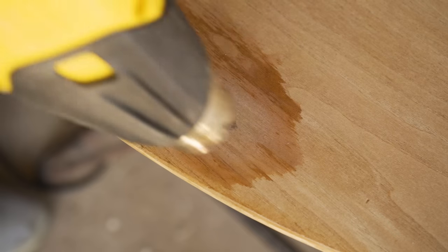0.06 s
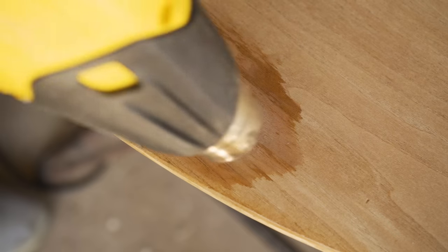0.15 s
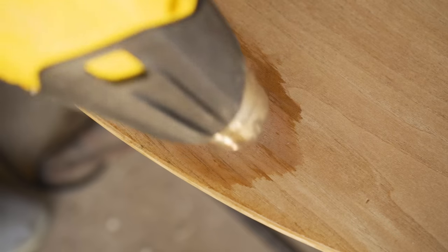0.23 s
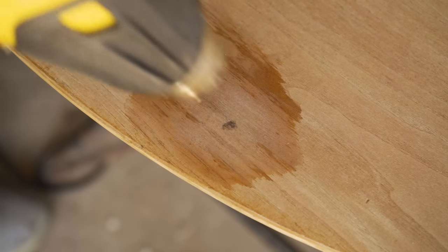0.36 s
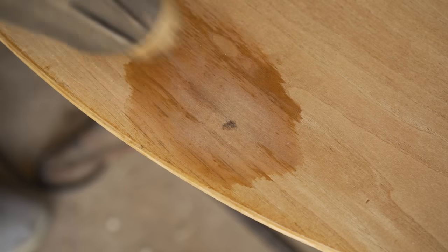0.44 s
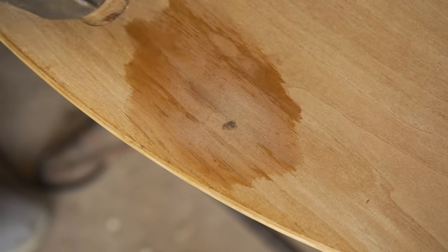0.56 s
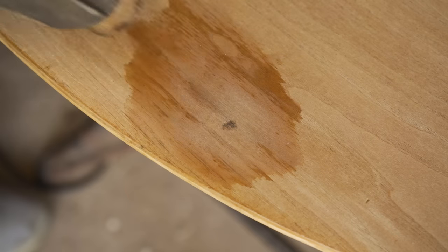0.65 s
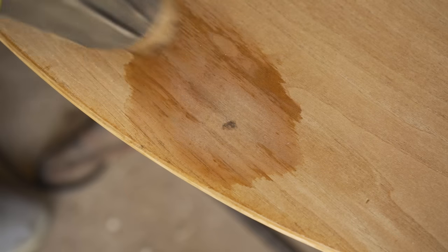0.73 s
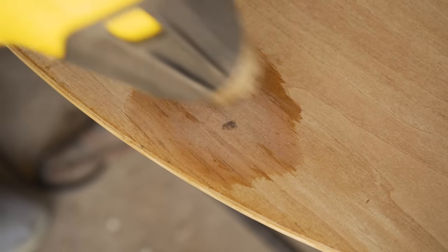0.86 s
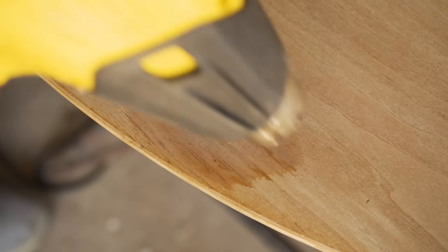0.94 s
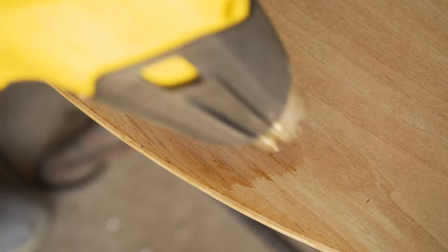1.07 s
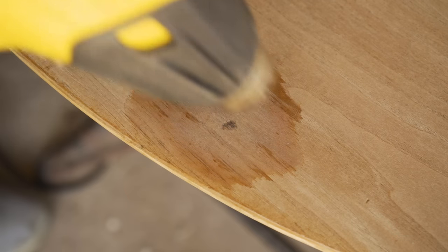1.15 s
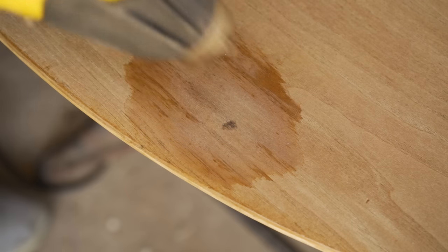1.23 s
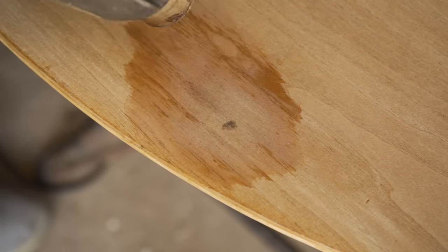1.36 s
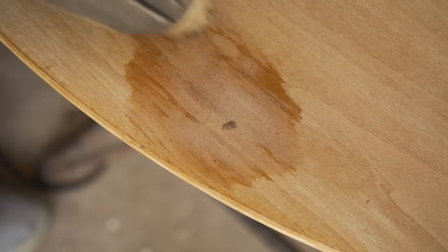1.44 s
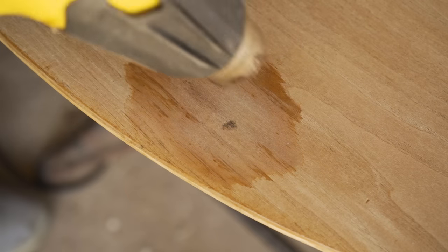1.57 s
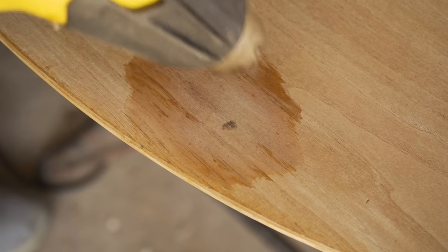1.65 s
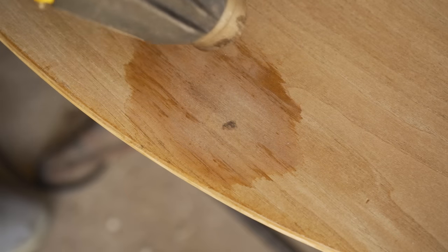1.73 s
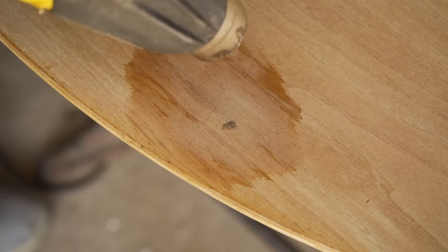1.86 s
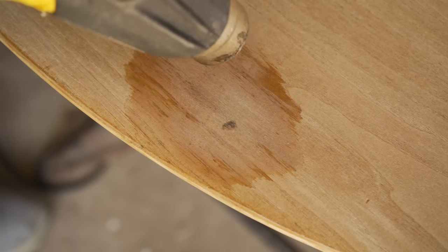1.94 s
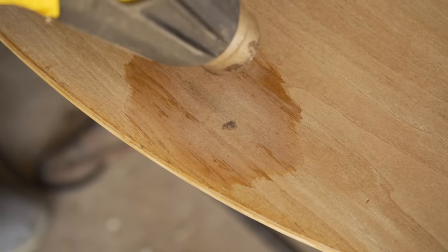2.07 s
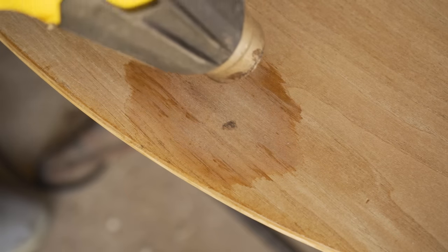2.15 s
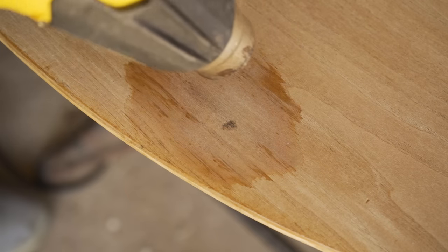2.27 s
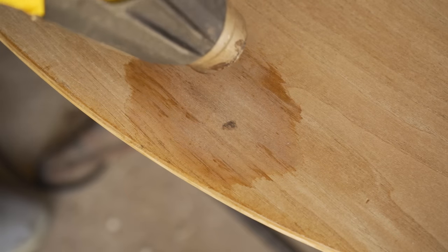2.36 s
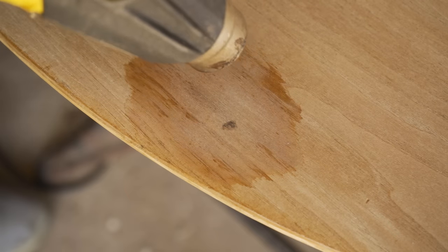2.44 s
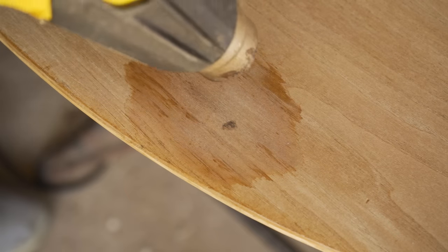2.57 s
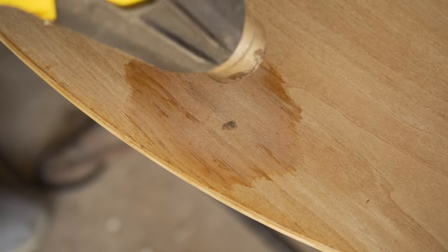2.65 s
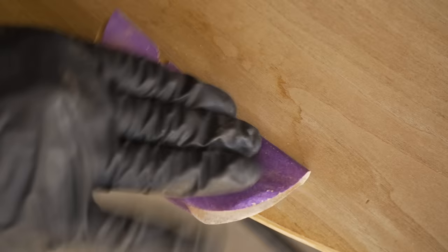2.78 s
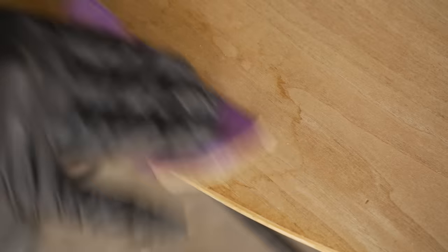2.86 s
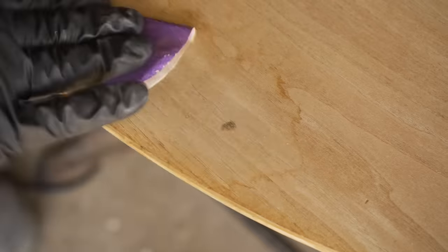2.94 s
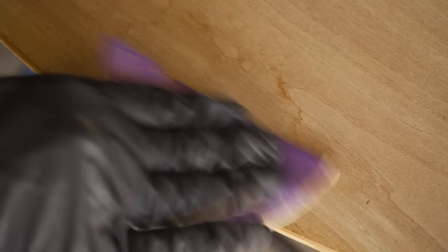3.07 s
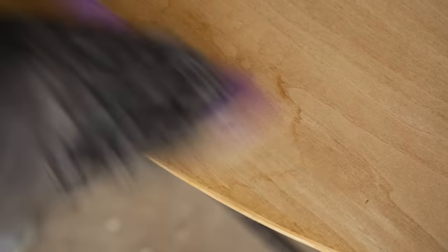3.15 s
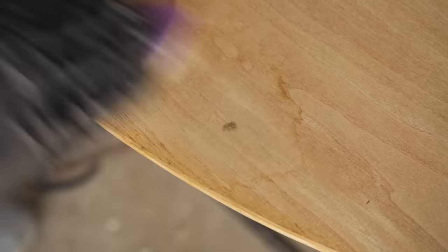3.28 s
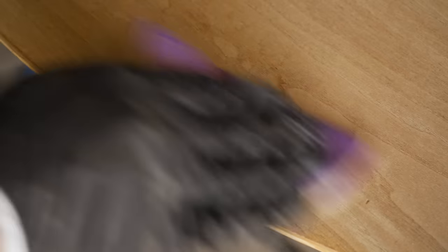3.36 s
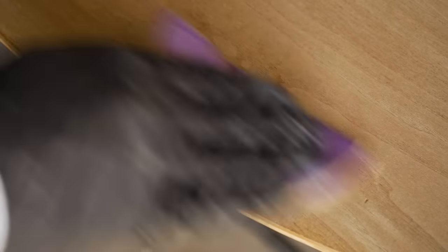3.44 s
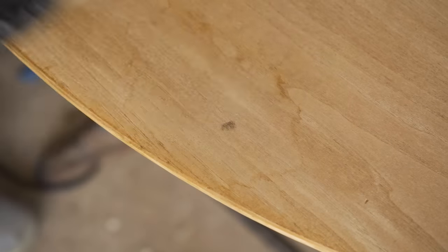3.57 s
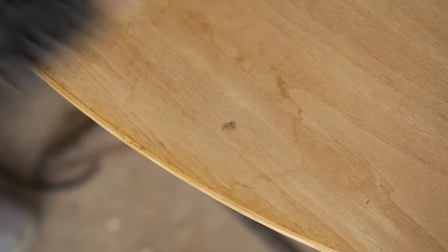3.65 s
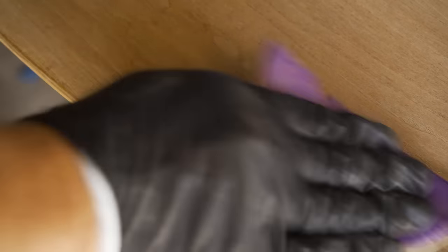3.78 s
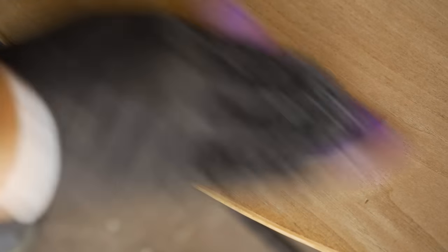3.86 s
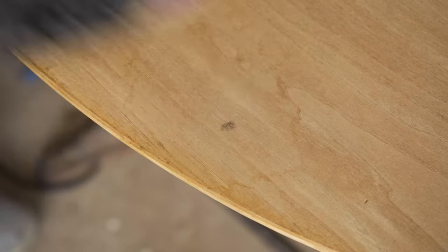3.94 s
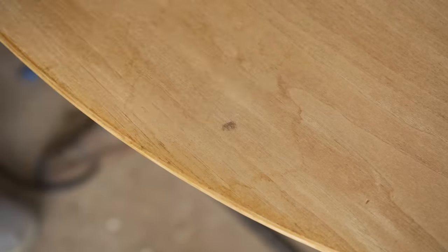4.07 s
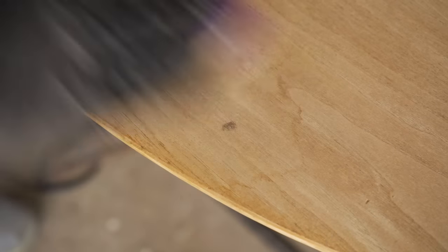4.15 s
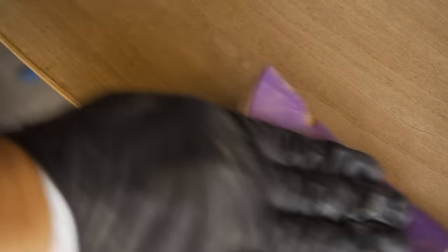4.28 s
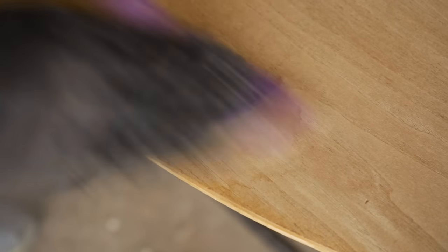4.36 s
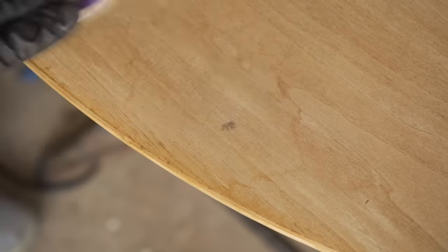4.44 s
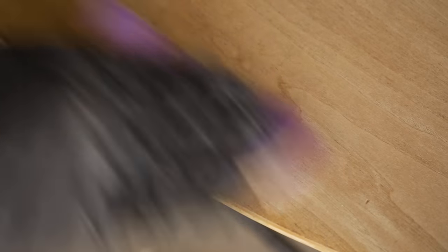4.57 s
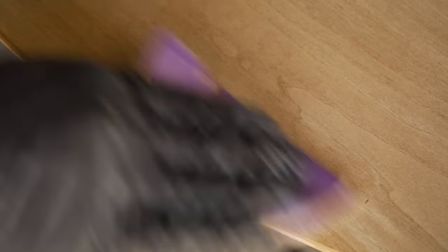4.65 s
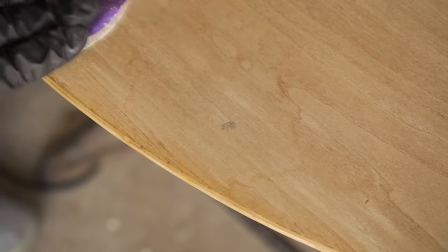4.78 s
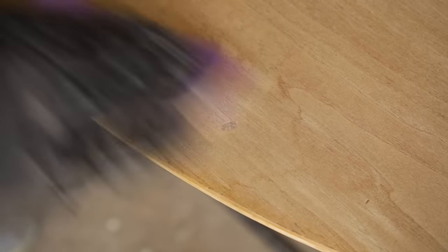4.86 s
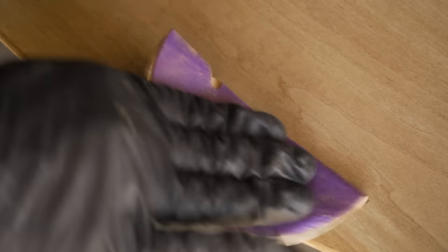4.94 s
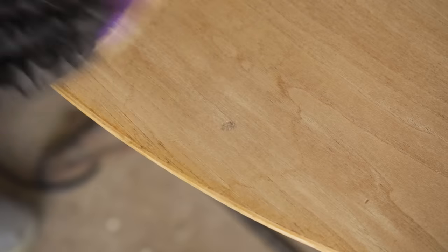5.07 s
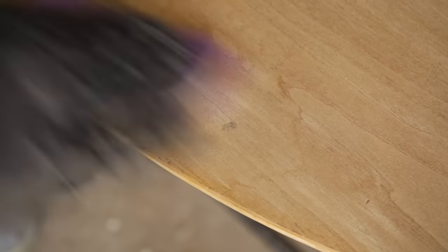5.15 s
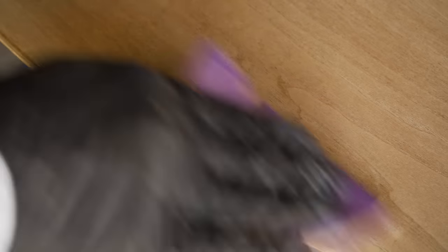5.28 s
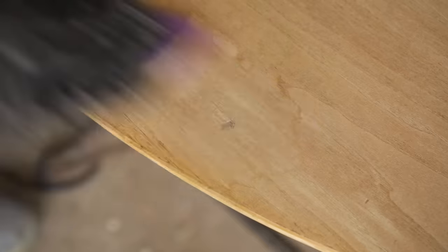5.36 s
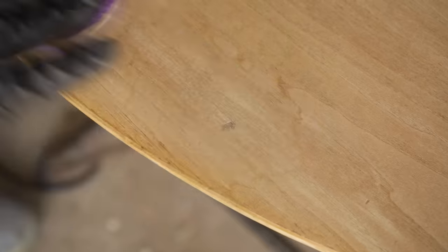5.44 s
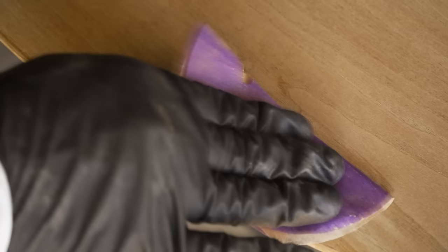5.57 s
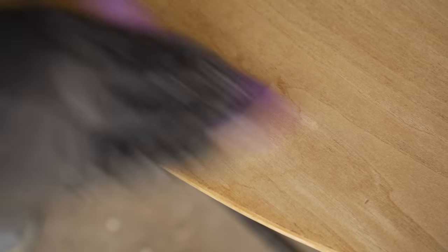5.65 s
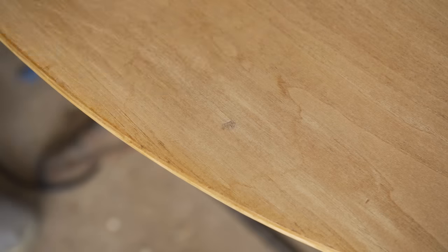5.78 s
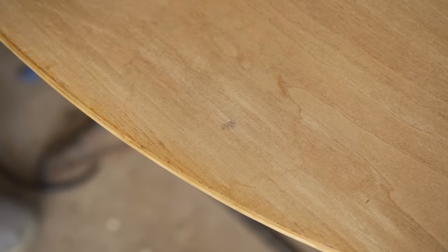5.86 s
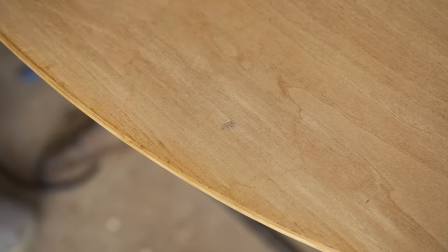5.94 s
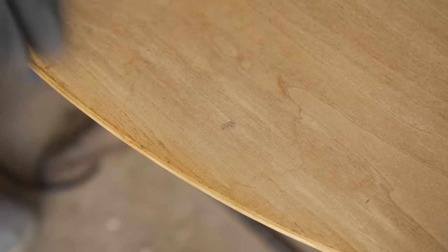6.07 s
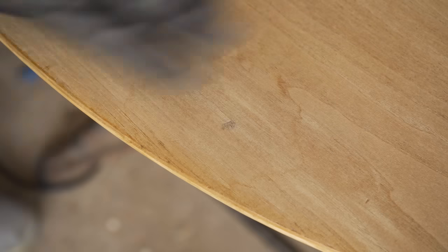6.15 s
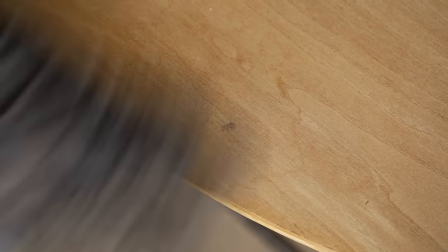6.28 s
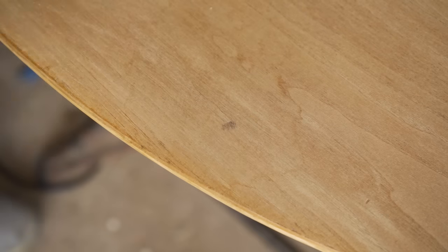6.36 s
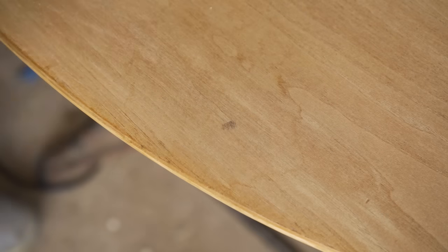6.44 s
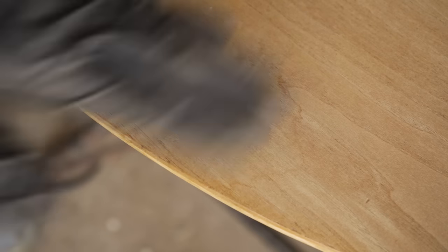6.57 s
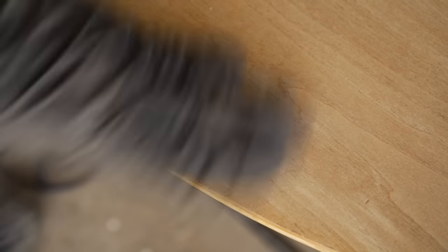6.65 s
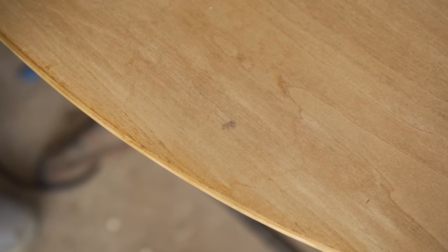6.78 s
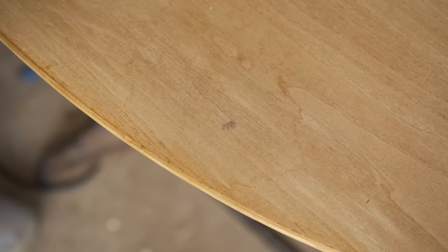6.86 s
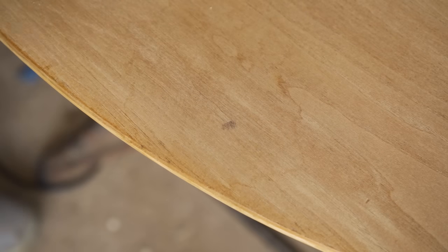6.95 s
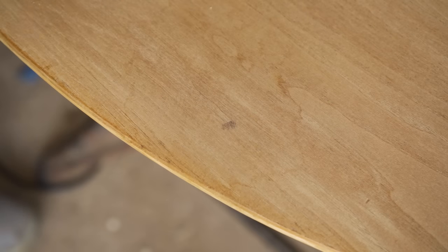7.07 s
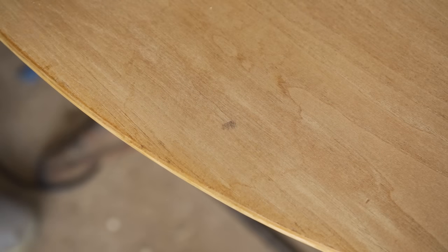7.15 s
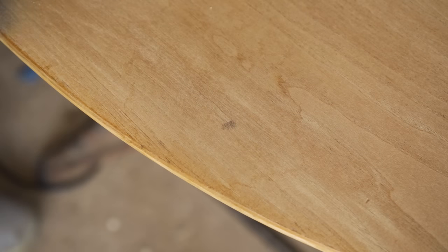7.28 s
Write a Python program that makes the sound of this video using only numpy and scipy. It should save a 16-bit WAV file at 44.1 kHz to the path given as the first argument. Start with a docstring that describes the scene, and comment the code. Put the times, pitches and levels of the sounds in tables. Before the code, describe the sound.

Steady hot-air blower noise stops dead, sandpaper rasps to and fro on a thin wooden panel, then two brushing sweeps and clattering wooden knocks.

```python
"""The roar of a hot-air blower with whining shaft tones is heard first; then the scene changes, and a hand
sands a thin panel to and fro. Then, over a faint hush, a glove sweeps dust off twice and the panel knocks on
its stand in a small workshop. Air and friction are shaped noise, the whine is sines at multiples of the shaft
speed, and the knocks are damped panel modes with noisy slaps; a short reverberation follows the contacts, on
one microphone."""
import sys
import numpy as np
from scipy import signal
from scipy.fft import rfft, irfft, next_fast_len
from scipy.io import wavfile
from scipy.ndimage import uniform_filter1d, map_coordinates

SR = 44100
rng = np.random.default_rng(int(sys.argv[2]) if len(sys.argv) > 2 else 0)


def convert_level_to_amplitude(level_db):
    """Map a level in decibels to its linear amplitude factor."""
    exponent = np.asarray(level_db, float) / 20
    return 10 ** exponent


def to_wav(sig):
    """Store sig (one row per channel, or 1-D mono) as 16-bit WAV at the path in sys.argv[1].

    Samples outside -1..1 are clipped; the rate is SR.
    """
    pcm = np.clip(np.atleast_2d(sig), -1, 1) * 32767
    pcm = np.round(pcm).astype(np.int16)
    wavfile.write(sys.argv[1], SR, pcm.T)  # frames by channels


N = 322529
BLOWER_END = 2.833  # s

# modes of the wooden panel: (frequency [Hz], relative level [dB], t60 [s])
PANEL_MODES = [(93.2, 2, .4), (156.3, 2.5, .3), (210, -12.5, 0.095), (248.4, 0.5, 0.34), (290, -6.5, 0.22),
               (342.5, -2.5, 0.2), (390, -27, 0.25), (565, -12, 0.23), (612.3, -6.5, 0.31), (726, -16, .15),
               (893, -25, 0.14), (1050, -31, 0.13), (1280, -13, 0.1), (1550, -10, 0.17), (1800, -13, 0.087),
               (2070, -16, .1), (2340, -16, .08), (4500, -12, .12)]
# sanding strokes, pull and push in turn:
# (start [s], end [s], level [dB], lean from start to end [dB], speeding-up time constant [ms])
SANDING_STROKES = [(2.862, 3.017, -41, -6, 46), (3.031, 3.16, -38.5, -1, 28.6), (3.168, 3.3, -39, -2.5, 16),
                   (3.309, 3.472, -38.5, 9, 16.4), (3.476, 3.67, -37, -2.5, 23),
                   (3.672, 3.873, -35.5, 2.5, 25), (3.873, 4.108, -35, -3, 24.4),
                   (4.118, 4.34, -35.5, 3.5, 24), (4.334, 4.53, -35.5, -6, 31),
                   (4.542, 4.694, -38.5, 6.5, 11.7), (4.693, 4.855, -38.5, -3.5, 22),
                   (4.868, 5.011, -38.5, 5, 15), (5.009, 5.161, -39, -3.5, 24.5),
                   (5.17, 5.32, -38, 7, 11.6), (5.324, 5.491, -38, -4.5, 16.5), (5.508, 5.654, -38, 4, 8.2),
                   (5.658, 5.87, -39.5, -4.5, 20)]


def unit(x):
    """Normalisation: the signal is scaled to rms 1."""
    return x / np.sqrt(np.mean(x ** 2) + 1e-20)


def along(points, hz):
    """Interpolation of (frequency [Hz], value) points on a logarithmic frequency axis."""
    f, v = np.transpose(points)
    return np.interp(np.log(hz + 1), np.log(f + 1), v)


def curves(rows):
    """Linear interpolation in time: one value per sample for each column after the time."""
    s, *cols = np.transpose(rows)
    return [np.interp(np.arange(N) / SR, s, c) for c in cols]


def wobble(rate):
    """Band-limited fluctuation: a smooth random curve with rate knots a second."""
    knots = rng.standard_normal(int(N * rate / SR) + 4)
    return map_coordinates(knots, [np.arange(N) * rate / SR])


def filtered(x, response):
    """Linear filtering: the spectrum is multiplied by a response of frequency."""
    m = next_fast_len(N + 8192)
    return irfft(rfft(x, m) * response(np.fft.rfftfreq(m, 1 / SR)), m)[..., :N]


def rush(spectrum, patchy_db, grit_db=0):
    """Coloured noise of rms 1: random gain patches in time and frequency; grit makes single grains stand out."""
    z = signal.stft(rng.standard_normal(N), nperseg=512)[2]
    field = uniform_filter1d(rng.standard_normal(z.shape), size=8, axis=0)
    field = uniform_filter1d(field, size=8, axis=1)
    noise = signal.istft(z * convert_level_to_amplitude(patchy_db * unit(field)), nperseg=512)[1][:N]
    grains = convert_level_to_amplitude(grit_db * unit(uniform_filter1d(rng.standard_normal(N), size=24)))
    return unit(filtered(noise * grains, lambda hz: convert_level_to_amplitude(along(spectrum, hz))))


def speed(start, end, up_ms, down_ms):
    """Kinematics of a stroke: hand speed 0-1 gathers after one turning point and drops before the next."""
    t = np.arange(N) / SR
    gathering = np.tanh(np.clip(t - start, 0, None) * 1e3 / up_ms)
    slowing = np.tanh(np.clip(end - t, 0, None) * 1e3 / down_ms)
    return gathering * slowing


def pressure(start, end, db, lean_db, ends_db=0):
    """Normal force as gain: it leans toward one end of the stroke; a positive ends_db adds force at both ends."""
    u = np.clip((np.arange(N) / SR - start) / (end - start), 0, 1) * 2 - 1  # -1 at the start, 1 at the end
    return convert_level_to_amplitude(db + lean_db * u / 2 + ends_db * u ** 2)


def shop(x):
    """Room reverberation: noise tails decay at a rate set by frequency, a new one for each stretch of sound."""
    # reverberation of the workshop: (frequency [Hz], t60 [s])
    reverberation = [(200, 0.44), (1500, 0.25), (4000, 0.37), (12000, 0.22)]
    out, step = np.zeros(N + 2 * SR), SR // 4
    for i in range(round(BLOWER_END * SR), N, step):
        hz, t, z = signal.stft(rng.standard_normal(SR // 2), SR, nperseg=256)
        decay = convert_level_to_amplitude(-60 * t / along(reverberation, hz)[:, None])
        tail = signal.istft(z * decay, SR, nperseg=256)[1]
        wet = signal.fftconvolve(x[i:i + step], tail / np.linalg.norm(tail))
        out[i + 200:][:len(wet)] += wet  # delay of 200 samples
    return out[:N]


def rustle():
    """Broadband noise with exponential envelopes: cloth swishes over the room's steady hush."""
    # cloth swishes: (loudest at [s], level [dB], swelling time constant [s], fading time constant [s])
    swishes = [(6.1, -65.5, .003, .02), (6.21, -65.5, 0.085, 0.13), (6.63, -64, 0.012, 0.016),
               (6.69, -66, .02, 0.071), (6.96, -77, .012, 0.066), (7.136, -57, 0.0028, 0.0099),
               (7.215, -61.5, 0.022, 0.032), (7.25, -65.5, .02, .008)]
    # spectrum of the rubbing cloth: (frequency [Hz], relative density [dB per Hz])
    cloth_spectrum = [(600, -5), (1200, -12), (2500, -3), (4500, 0), (7000, -6.5), (11000, -14.5),
                      (15800, -21)]
    # spectrum of the room's hush: (frequency [Hz], relative density [dB per Hz])
    hush_spectrum = [(500, -30), (900, -2), (1500, -4.5), (4000, -3), (8000, -9), (14900, -14),
                     (15700, -18)]
    hush_db, start_s = -74, 6.0
    t = np.arange(N) / SR
    swish = np.zeros(N)
    for s, db, rise, fade in swishes:
        swish += convert_level_to_amplitude(db) * np.exp(np.where(t < s, (t - s) / rise, (s - t) / fade))
    cloth = swish * convert_level_to_amplitude(1.3 * wobble(30)) * rush(cloth_spectrum, patchy_db=2.0, grit_db=3.0)
    hush = convert_level_to_amplitude(hush_db) * rush(hush_spectrum, patchy_db=-0.5, grit_db=1.5)
    return (cloth + hush) * (t > start_s)


def resonance(f, hz, db, t60):
    """Response of a damped resonator: its bandwidth is inverse to its decay time."""
    return convert_level_to_amplitude(db) * (3 / t60) / (hz - f + 3j / t60)


def tremble():
    """Forced vibration: unsteady hand force keeps the panel humming; its rocking on the stand goes its own way."""
    # level of the held panel's hum: (time [s], rocking [dB], low modes [dB], middle modes [dB])
    hum_levels = [(2.84, -77, -81, -70), (2.94, -86, -66, -58.5), (3.1, -80, -72, -56),
                  (3.3, -78, -74.5, -65), (3.8, -76, -68.5, -71), (4.5, -77, -71.5, -67),
                  (5.2, -76.5, -75, -68), (5.75, -73, -69.5, -67.5), (5.96, -73, -72, -77.5),
                  (6.2, -74, -72.5, -75), (6.47, -68, -64, -72), (6.7, -66, -69.5, -76),
                  (6.89, -60.5, -60, -68.5), (7.07, -77, -67, -78), (7.31, -66, -71, -72)]
    # dense middle modes of the panel, blurred together: (frequency [Hz], relative density [dB per Hz])
    middle_spectrum = [(300, -44), (450, -4.5), (610, -1.5), (900, -3), (1400, -0.5), (2500, -9),
                       (5000, -21)]

    def rocking_response(f):
        return resonance(f, *PANEL_MODES[0]) ** 2 + .04 * (f < 85)

    def low_response(f):
        modes = sum(resonance(f, *row) for row in PANEL_MODES[1:9])
        return modes / (1 + (120 / (f + 1)) ** 4)

    force = rng.standard_normal((2, N)) * convert_level_to_amplitude(4.1 * np.array([wobble(7.0), wobble(22)]))
    rocking = unit(filtered(force[0], rocking_response))
    low = unit(filtered(force[1], low_response))
    middle = rush(middle_spectrum, patchy_db=2.5, grit_db=2.4)
    rocking_db, low_db, middle_db = curves(hum_levels)
    hum = convert_level_to_amplitude(rocking_db) * rocking + convert_level_to_amplitude(low_db) * low + convert_level_to_amplitude(middle_db) * middle
    return hum * (np.arange(N) > BLOWER_END * SR)


def ticks():
    """Impulsive contact of grit and glove: a few damped cycles, a sharp edge and a puff of noise."""
    # small ticks: (time [s], nominal level [dB], frequency [Hz])
    tick_list = [(2.8414, -30.5, 4050), (2.848, -42, 4000), (3.022, -46, 1200), (5.9908, -66, 3540),
                 (6.0967, -54, 3570), (6.12, -55, 4590), (6.1554, -48.5, 1800), (6.288, -52, 3000),
                 (6.394, -31, 4500), (6.6388, -50.5, 1880), (6.9486, -57, 2070), (6.9723, -49, 2120),
                 (6.997, -55, 2150), (7.0473, -49.5, 2060), (7.1345, -50, 4380), (7.212, -56, 3320),
                 (7.2545, -50, 2480)]
    out, t = np.zeros(N + SR), np.arange(SR // 40) / SR
    for s, db, hz in tick_list:
        noise = rng.standard_normal(len(t))
        cycles = np.sin(2 * np.pi * hz * t) * convert_level_to_amplitude(-60 * t / 0.0039)
        edge = .2 * convert_level_to_amplitude(-60 * t / 0.00099)
        puff = 0.1 * convert_level_to_amplitude(-60 * t / 0.024)
        out[round(s * SR):][:len(t)] += convert_level_to_amplitude(db + 3.5) * (cycles + noise * (edge + puff))
    return out[:N]


def chatter(count=3):
    """Repeated impact: the panel chatters on its stand at uneven gaps, each blow in a set weaker than the last."""
    # chatter after a hard contact: (start [s], first ring level [dB], best-rung pitch [Hz], nominal gap [s])
    rattles = [(6.41, -50, 230, .02), (6.716, -49, 250, 0.017), (6.796, -54, 500, .024)]
    loss_db, slap_db, slap_t60 = 1, -9, .045  # loss per blow, slap relative to ring, slap decay in s
    late = rng.uniform(-0.22, 0.196, (len(rattles), count))
    blows = []
    for j, (s, db, hz, gap) in enumerate(rattles):
        for k in range(count):
            ring_db = db - loss_db * k
            blows.append((s + gap * (k + late[j, k]), ring_db, hz, ring_db + slap_db, slap_t60))
    return blows


def nudges():
    """Impulse from reversal: each change of the hand's direction nudges the panel just after a stroke sets off."""
    ring_db, scatter_db, best_hz = -67, 2.5, 230
    slap_db, slap_t60 = -72, .04  # dB, s
    median_delay = .024  # s
    blows = []
    for row, c in zip(SANDING_STROKES, rng.standard_normal((len(SANDING_STROKES), 2))):
        s = row[0] + median_delay * convert_level_to_amplitude(2 * c[0])
        change_db = scatter_db * c[1]
        blows.append((s, ring_db + change_db, best_hz, slap_db + change_db, slap_t60))
    return blows


def knocks():
    """Modal excitation: each blow slaps the surface and rings modes most near a pitch set by the contact."""
    # blows on the panel: (time [s], nominal ring level [dB], best-rung pitch [Hz], slap level [dB], slap t60 [s])
    knock_list = [(2.833, -53.5, 250, -41, 0.059), (3.186, -56, 210, -56, .05),
                  (3.508, -43.5, 620, -49, .04), (4.361, -60, 200, -66, .05),
                  (4.707, -58.5, 222, -56, 0.085), (5.853, -50.5, 400, -42, 0.093),
                  (6.303, -40.5, 201, -37.5, 0.06), (6.324, -42, 220, -60, .05),
                  (6.365, -59, 700, -42, .02), (6.382, -32.5, 330, -39.5, 0.049),
                  (6.391, -35, 170, -38, 0.14), (6.397, -39, 130, -47, .028),
                  (6.444, -44.5, 248, -58, 0.058), (6.462, -47, 200, -63, 0.087),
                  (6.703, -49, 300, -43.5, 0.073), (6.763, -60, 700, -42, .022),
                  (6.774, -39.5, 230, -49, .049), (6.787, -46, 400, -43, 0.065),
                  (6.81, -40.5, 402, -53, 0.058), (6.829, -50, 450, -49, .075)]
    # spectrum of a slap: (frequency [Hz], relative density [dB per Hz])
    slap_spectrum = [(200, -23), (500, 3), (900, -2), (1800, -1), (2500, -3.5), (3200, -9.5), (4500, -7.5),
                     (6500, -13.5), (15000, -42)]
    out, t = np.zeros(N + SR), np.arange(SR // 2) / SR
    hz, mode_db, t60 = np.transpose(PANEL_MODES)[:, :, None]
    blows = knock_list + chatter() + nudges()
    chance = rng.standard_normal((len(blows), len(PANEL_MODES), 3))  # for strength, pitch and phase
    slaps = rush(slap_spectrum, patchy_db=3.5, grit_db=3.0)
    # the resting hand damps the wood hard at first, then the weaker free ring remains
    decay = convert_level_to_amplitude(-60 * t / 0.072) + convert_level_to_amplitude(-9.0 - 60 * t / t60)
    envelope = decay * (1 - np.exp(-t / 0.00044))
    for (s, db, best_hz, slap_db, slap_t60), c in zip(blows, chance):
        strength = convert_level_to_amplitude(0.61 * mode_db + 2 * c[:, :1] - 5.7 * np.log2(hz / best_hz) ** 2)
        pitch = hz * (1 + 0.012 * c[:, 1:2])
        phase = np.pi + 1.34 * c[:, 2:]
        ring = np.sum(strength * envelope * np.sin(2 * np.pi * pitch * t + phase), axis=0)
        i = round(s * SR)
        out[i:][:len(t)] += convert_level_to_amplitude(db - 1.5) * ring
        slap = slaps[i:][:len(t)]
        out[i:][:len(slap)] += convert_level_to_amplitude(slap_db - 60 * t[:len(slap)] / slap_t60) * slap
    return out[:N]


def sweeping():
    """Sliding friction: the glove rubs over the dusty surface, louder with speed and pressure."""
    # sweeps of the glove: (start [s], end [s], level [dB], lean from start to end [dB])
    sweeps = [(6.294, 6.376, -36, 9.5), (6.695, 6.773, -39.5, 7)]
    # spectrum of the glove on wood: (frequency [Hz], relative density [dB per Hz])
    glove_spectrum = [(800, -29), (1300, -18), (2000, -16), (2800, -7.5), (3600, -4), (5000, -4),
                      (9500, -6), (15800, -15)]
    push = np.zeros(N)
    for start, end, db, lean_db in sweeps:
        push += speed(start, end, up_ms=6.1, down_ms=18) ** 2 * pressure(start, end, db, lean_db)
    return push * rush(glove_spectrum, patchy_db=2.5, grit_db=1.0)


def blower():
    """Flow noise and rotor harmonics: fan roar, nozzle hiss, and shaft tones that swell and fade."""
    # speed of the motor shaft: (time [s], speed [turns per s])
    shaft = [(0, 221.1), (.65, 221.3), (1.7, 221.3), (2.83, 221.5)]
    # tones, fan blades low and brushes high: (multiple of the shaft speed, nominal level [dB rms])
    whine = [(12, -63), (25, -73), (35, -80), (43, -84), (45, -82), (46, -84), (47, -84), (48, -88),
             (49, -83), (50, -82), (51, -85), (52, -86), (53, -84), (54, -87), (54.5, -89), (55, -79),
             (56, -85), (58, -83), (59, -81), (59.5, -94), (60, -84), (60.5, -92), (61, -83), (61.5, -95),
             (62, -90), (63, -92), (64, -94), (65, -92), (67, -94), (69, -95), (69.5, -99), (70, -87),
             (70.5, -99), (71, -97)]
    # roar of the fan: (frequency [Hz], relative density [dB per Hz])
    roar_spectrum = [(29, -69), (50, -25), (106, -16), (128, -12.5), (339, -8), (448, -7.5), (592, -1.5),
                     (782, -2), (853, 1.5), (963, -3.5), (1390, -1), (2040, -3.5), (2420, -10.5),
                     (2740, -8.5), (3200, -23), (4160, -48), (7040, -120)]
    # hiss through barrel and nozzle: (frequency [Hz], relative density [dB per Hz])
    hiss_spectrum = [(1880, -38), (3200, -8), (3810, 1), (4650, -11), (5150, -8), (5450, -12), (5900, -6),
                     (6630, -13), (7250, -10), (8260, -18), (9200, -16), (9960, -23), (11200, -22),
                     (12600, -28), (14200, -33), (15800, -36)]
    # level of the nozzle hiss: (time [s], level [dB])
    hiss_level = [(0, -53.5), (1.1, -52), (2.83, -52)]
    # change of the tones round the 60th multiple as the nozzle is waved: (time [s], level [dB])
    beam = [(0, 6), (.11, -5), (.18, 5), (.3, -11), (.46, 7.5), (.57, -4), (.74, 8), (.83, -1), (.92, 9),
            (1.02, -9), (1.17, -13), (1.28, 9), (1.39, -1), (1.52, 10), (1.69, -2), (1.76, 6), (2.16, 5),
            (2.83, 5)]
    roar_db = -42
    n = round(BLOWER_END * SR)
    air = convert_level_to_amplitude(roar_db) * rush(roar_spectrum, patchy_db=1)
    air += convert_level_to_amplitude(curves(hiss_level)[0]) * rush(hiss_spectrum, patchy_db=0.6)
    turns_per_s = curves(shaft)[0] + 0.14 * wobble(30.7)
    angle = 2 * np.pi * np.cumsum(turns_per_s)[:n] / SR
    beam_db = curves(beam)[0][:n]
    coarse = np.arange(n) * 7 / SR  # seven swell knots a second
    for k, db in whine:
        swell_db = 3.5 * map_coordinates(rng.standard_normal(30), [coarse], order=1)
        swell_db += beam_db * np.exp(-((k - 60) / 4) ** 2)
        tone = np.sin(k * angle + rng.uniform(0, 2 * np.pi))
        air[:n] += np.sqrt(2) * convert_level_to_amplitude(db - 1.0 + swell_db) * tone
    return air * np.clip((BLOWER_END - np.arange(N) / SR) / 0.0034, 0, 1)  # 3.4 ms fade


def sanding():
    """Abrasive friction: grit tears at the wood, and as the paper slows its treble fades first."""
    # spectrum of sandpaper on wood: (frequency [Hz], relative density [dB per Hz])
    paper_spectrum = [(410, -53), (700, -23.5), (874, -25), (1260, -19.5), (2350, -8), (4070, 1),
                      (5640, -2.5), (6950, -2), (13700, -5.5), (15200, -6.5), (15800, -19.5)]
    # slowing-down time constant as share of the stroke, extra pressure at both ends, treble, low-mid (dB)
    pull, push = (.09, 2.8, 0.36, 0.24), (0.1376, 6, 3.7, -0.45)
    lift_ms = 42  # the last stroke trails off as the paper is lifted
    grit = rush(paper_spectrum, patchy_db=0.87, grit_db=1.0)
    low = filtered(grit, lambda hz: 1 / (1 + (hz / 2800) ** 6))
    high = filtered(grit, lambda hz: 1 / (1 + (9000 / (hz + 1)) ** 4))
    middle = grit - low - high
    out = np.zeros(N)
    for k, (start, end, db, lean_db, up_ms) in enumerate(SANDING_STROKES):
        slowing, ends_db, treble_db, low_db = push if k % 2 else pull
        is_last = k + 1 == len(SANDING_STROKES)
        down_ms = lift_ms if is_last else slowing * (end - start) * 1e3
        v = speed(start, end, up_ms, down_ms)
        rub = v ** 2 * middle + convert_level_to_amplitude(low_db) * v ** 0.83 * low + convert_level_to_amplitude(treble_db) * v ** 6.3 * high
        out += pressure(start, end, db, lean_db, ends_db) * rub
    return out * convert_level_to_amplitude(1.06 * wobble(45))


def scene():
    """Superposition: all sources add at one microphone, copied to both channels."""
    rubbing, blows = sanding() + sweeping(), knocks() + ticks()
    reverberant = shop(convert_level_to_amplitude(-20) * rubbing + convert_level_to_amplitude(-10.5) * blows)
    mono = rustle() + tremble() + reverberant + blower() + blows + rubbing
    return np.array([mono, mono])


def band_limit(x):
    """A steep low-pass at the top of the band."""
    return signal.sosfilt(signal.butter(12, 16530, fs=SR, output="sos"), x)


def record(dry):
    """Band limiting: the microphone rolls off the deep bass, and nothing passes above the top frequency."""
    top_hz, bass_hz = 15760, 75
    mix = filtered(dry, lambda hz: (hz < top_hz) / (1 + (bass_hz / (hz + 1)) ** 5))
    return band_limit(mix)


dry = scene()
out = record(dry)
to_wav(out)
```